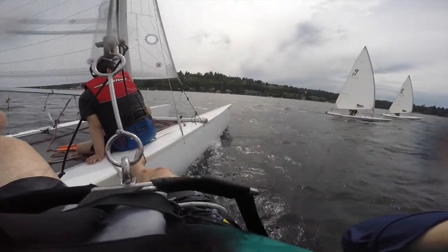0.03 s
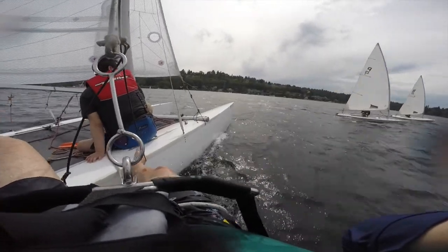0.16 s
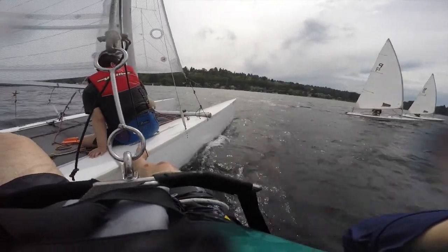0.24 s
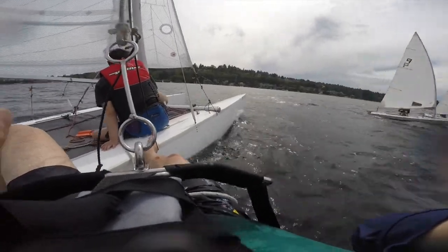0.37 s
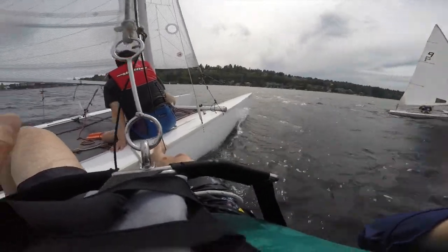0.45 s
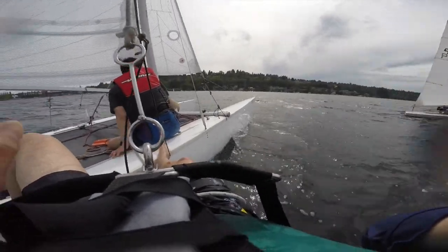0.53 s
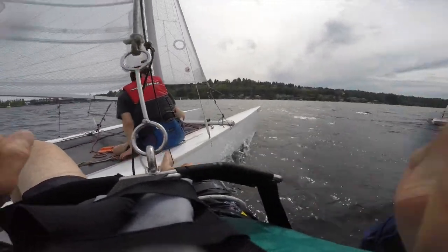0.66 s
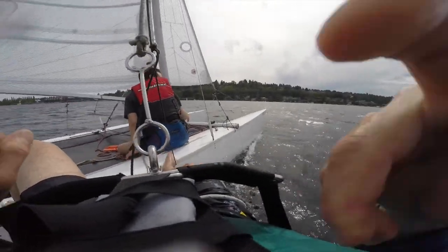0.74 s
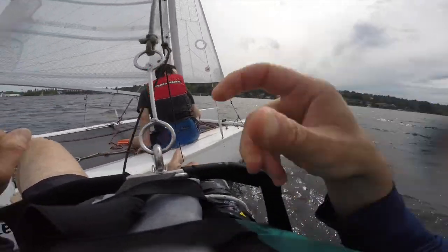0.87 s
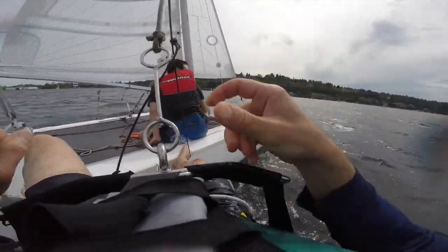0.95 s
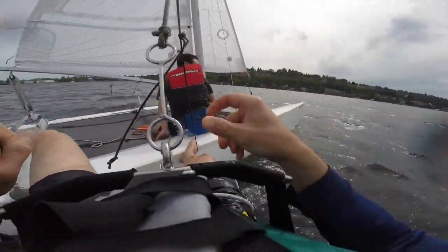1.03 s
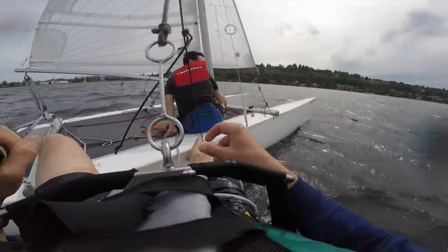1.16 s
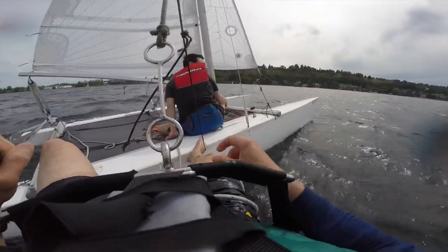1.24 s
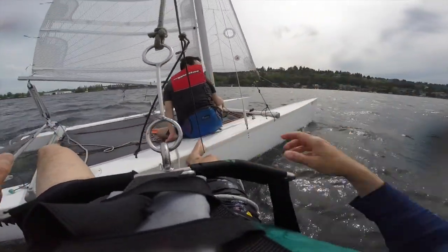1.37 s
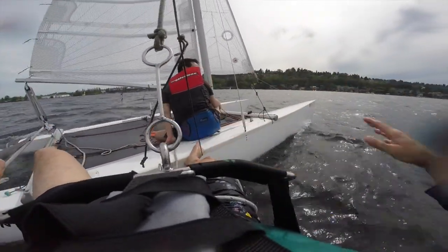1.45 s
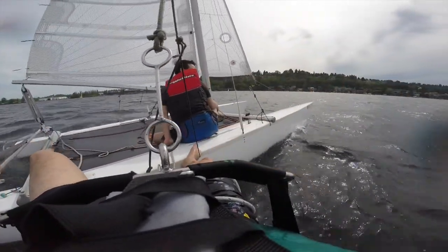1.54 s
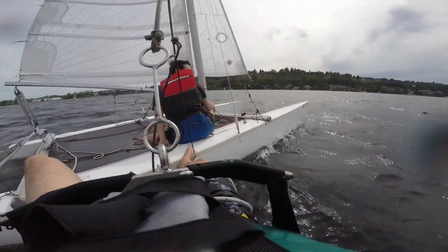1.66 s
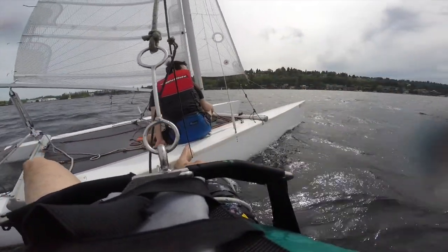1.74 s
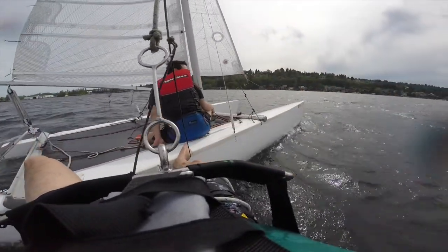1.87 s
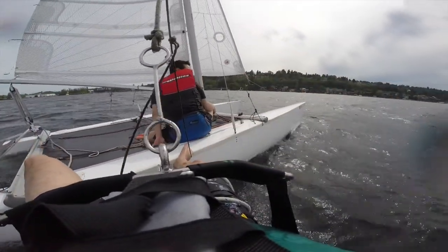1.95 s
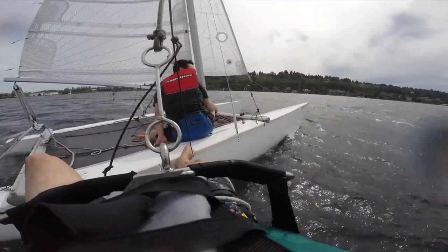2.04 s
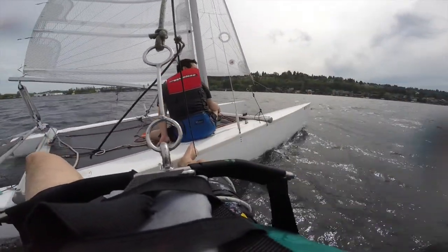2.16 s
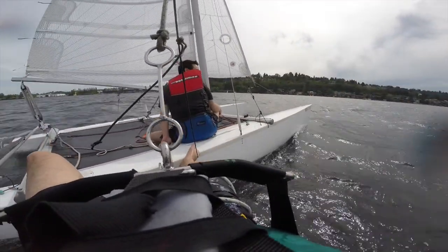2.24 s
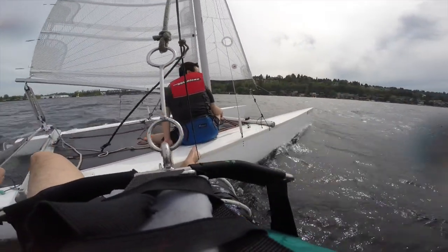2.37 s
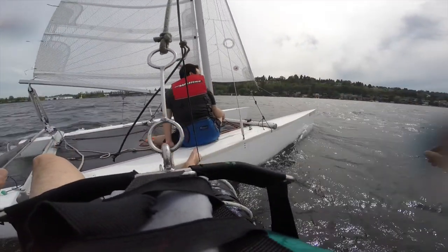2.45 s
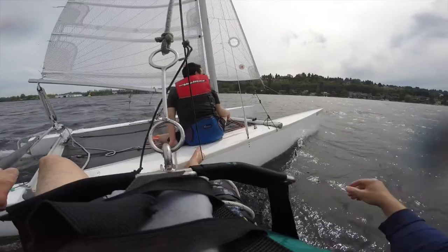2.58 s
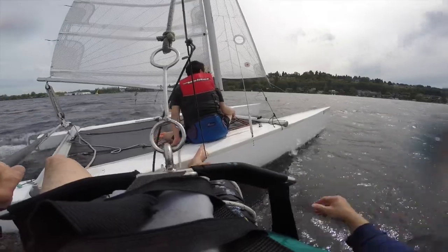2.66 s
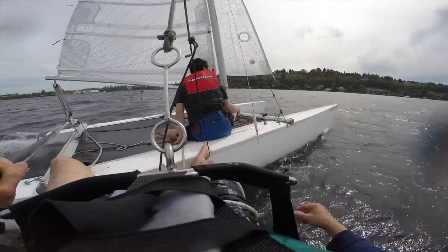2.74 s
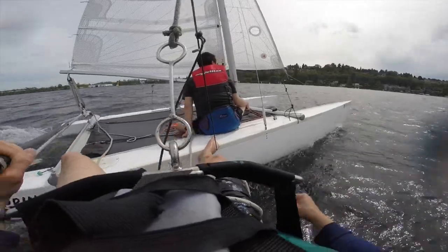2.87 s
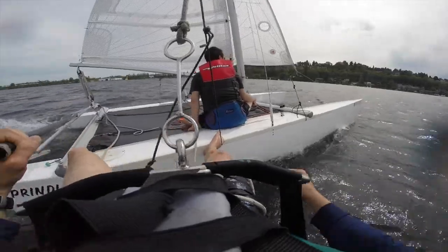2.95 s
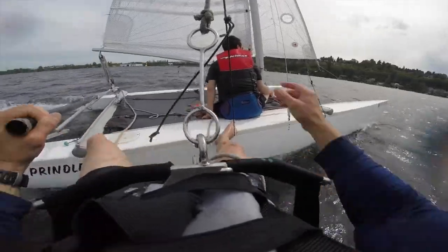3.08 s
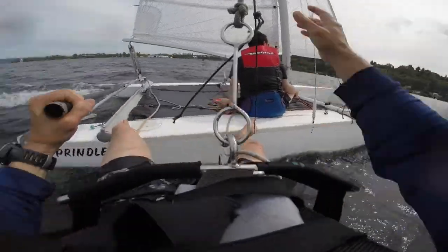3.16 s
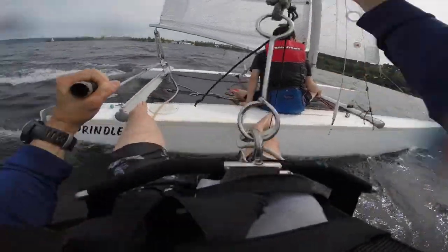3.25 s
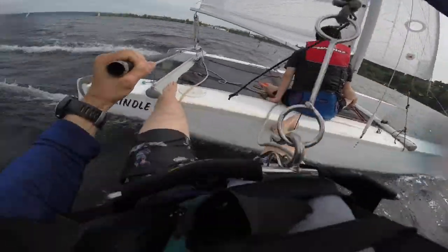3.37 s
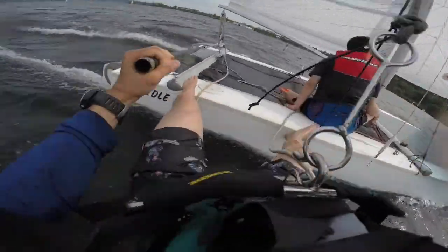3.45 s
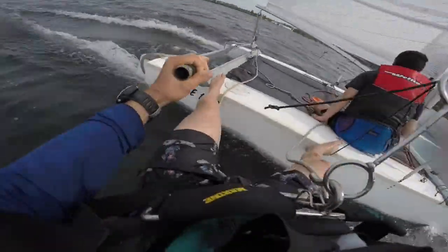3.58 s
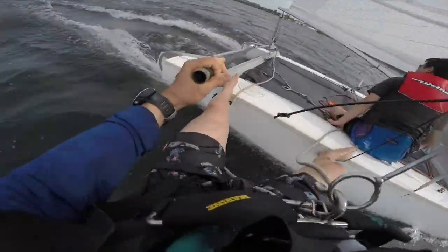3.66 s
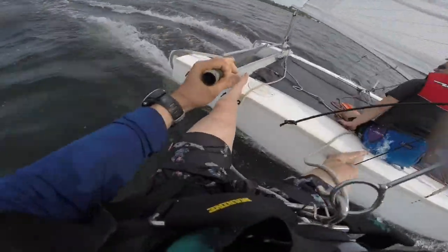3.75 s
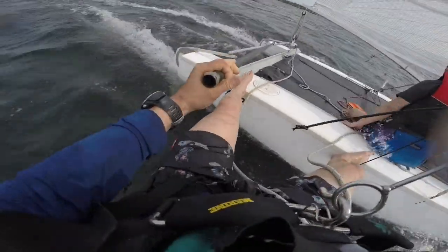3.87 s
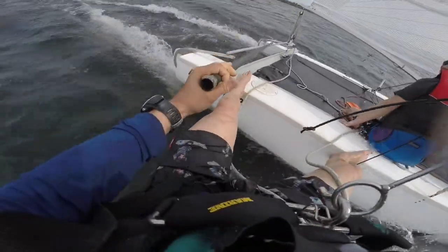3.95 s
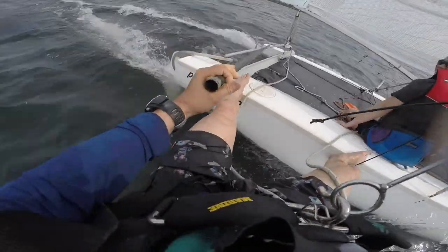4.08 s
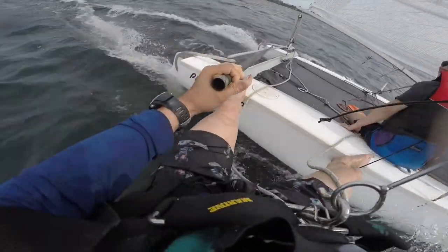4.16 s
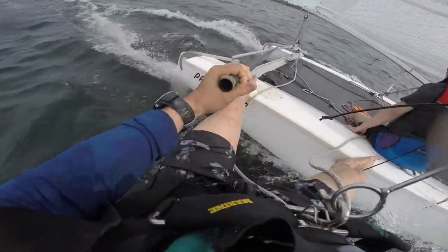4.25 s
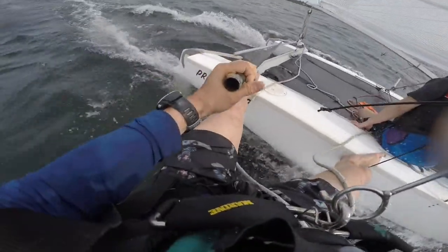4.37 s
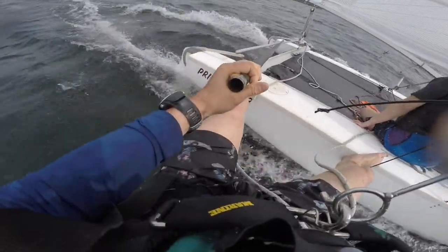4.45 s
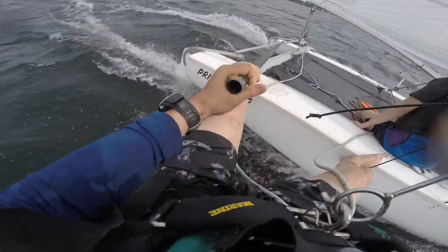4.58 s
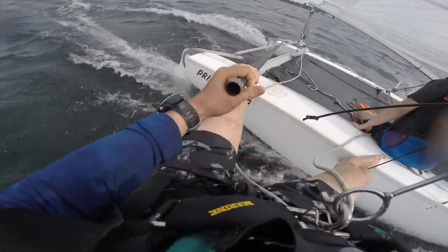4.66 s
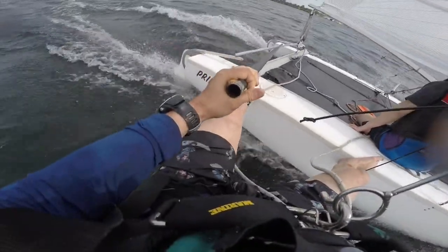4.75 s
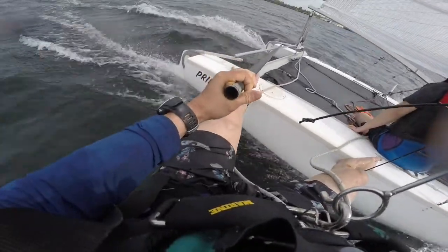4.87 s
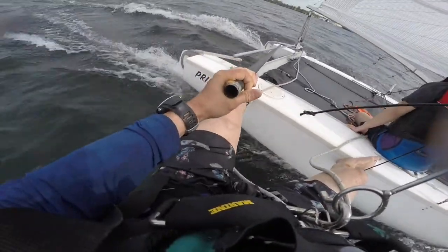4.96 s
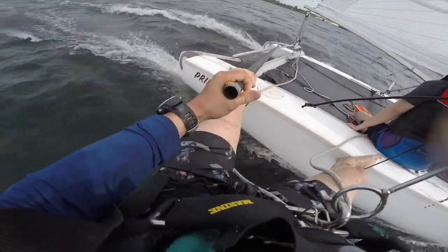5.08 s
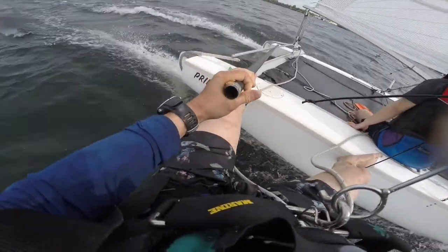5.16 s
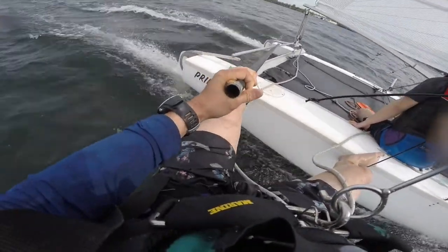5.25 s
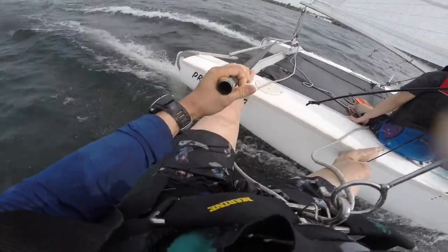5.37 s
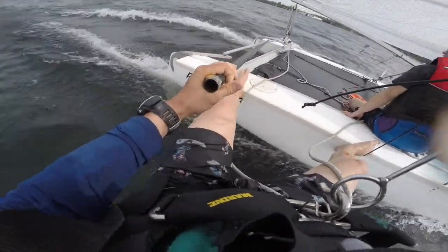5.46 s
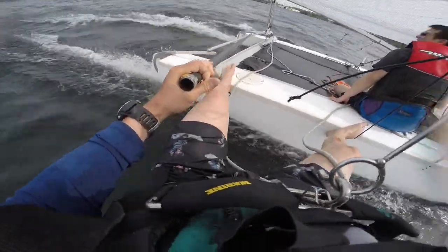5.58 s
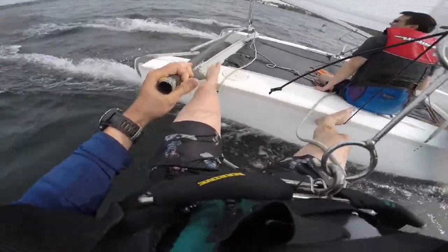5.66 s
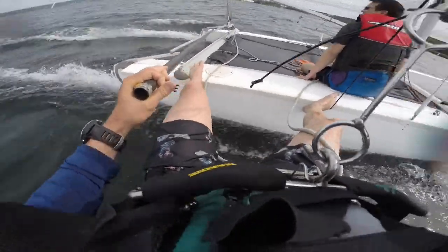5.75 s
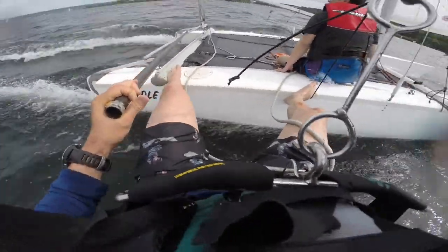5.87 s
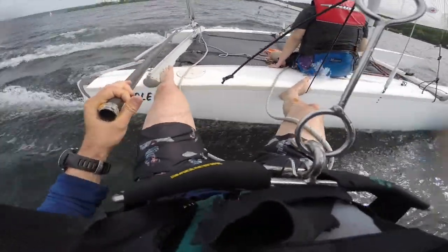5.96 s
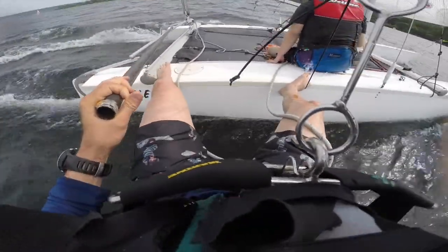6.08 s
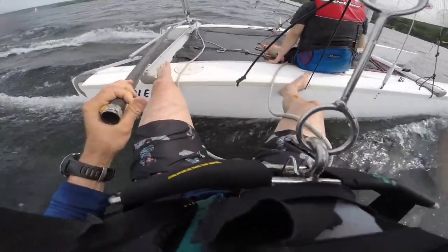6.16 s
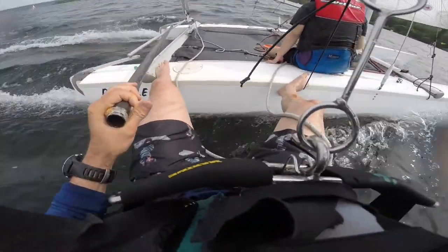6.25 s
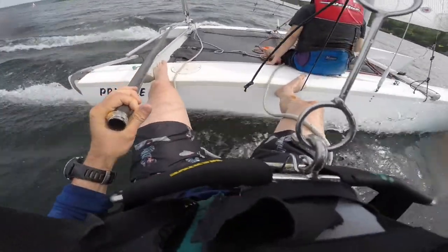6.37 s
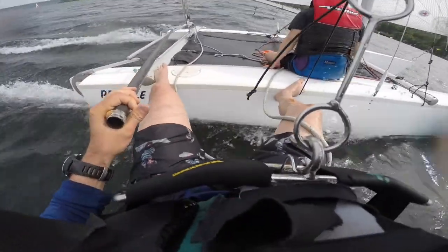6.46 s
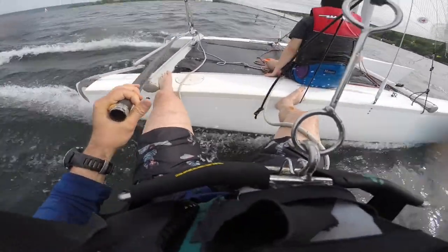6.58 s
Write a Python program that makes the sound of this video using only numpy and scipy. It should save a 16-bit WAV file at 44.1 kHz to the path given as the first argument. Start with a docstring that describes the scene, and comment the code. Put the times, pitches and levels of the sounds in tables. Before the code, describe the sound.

Water rushes and fizzes steadily along a small catamaran's hull, sounding boxy through a body-worn camera's waterproof case. Early on, harness hardware clacks loudly against the case several times. Wind rumbles and puffs, with a faint brief whistle and small wave slaps. Midway, clothing rubs and thuds on the microphone, then the wake turns brighter and hissier. A few lighter knocks follow, and a sharp double clack near the end.

```python
"""On choppy water aboard a small, fast catamaran; the microphone is in a camera in a waterproof case
worn by the helmsman. The wake rushes and fizzes through the resonances of the case, and small waves
slap the hull. Right at the microphone, harness hardware knocks on the case, and clothing rubs and
bumps it as he leans out over the side. Wind buffets the case and briefly whistles."""
import sys
import numpy as np
from scipy import signal
from scipy.fft import rfft, irfft
from scipy.io import wavfile
from scipy.ndimage import uniform_filter1d

SR = 44100
rng = np.random.default_rng(int(sys.argv[2]) if len(sys.argv) > 2 else 0)


def inscribe(sig):
    """Save sig as 16-bit PCM at rate SR to the path in sys.argv[1].

    A 1-D sig is mono; a 2-D sig holds one channel per row.
    Samples are clipped to [-1, 1] before scaling.
    """
    pcm = np.round(np.clip(np.atleast_2d(sig).T, -1, 1) * 32767)
    wavfile.write(sys.argv[1], SR, pcm.astype(np.int16))


N = 291930
T = np.arange(N) / SR
TOP_HZ = 15100  # upper limit of the camera's sound

# flow along the hull: (time [s], level above cruising [dB])
HULL_FLOW = [(0.1, 2.2), (0.55, -0.8), (1.08, 0.8), (1.7, -1.2), (2.05, -0.3), (2.75, -0.5), (3.3, 2.2),
             (4.2, -0.94), (4.6, 2.5), (5.1, 0.2), (5.9, 1), (6.3, 0), (6.62, 1)]
# swing of the microphone from the bow towards the wake: (time [s], share [0-1])
MIC_TURN = [(2.9, 0.15), (3.7, 1), (5.7, 0.98), (6.1, 0.4)]
# rushing water, heard from inside the case: (frequency [Hz], level [dB])
RUSH_SPECTRUM = [(200, -9.5), (450, -6), (750, -13.5), (1050, -7.5), (1350, -0.5), (1750, 2), (2000, -1.5),
                 (2400, -2), (2900, -13), (3300, -8), (3800, -16), (6000, -48)]
# spray, heard from inside the case: (frequency [Hz], level [dB])
SPRAY_SPECTRUM = [(2500, -12), (3600, -6.5), (4150, -1), (4700, -1.5), (4980, -4.5), (5450, 1.5),
                  (6200, -2), (7000, -8), (8100, -16), (10400, -13), (11300, -21), (12300, -19),
                  (14000, -24), (15500, -34)]
# change in the water's colour with the microphone on the wake: (frequency [Hz], gain [dB])
WAKE_TILT = [(400, 1.5), (750, 2), (1050, -2.5), (1350, 0), (2100, -1.5), (2700, -0.5), (3500, -2),
             (4300, 2), (5600, -0.5), (7000, 1.5), (8800, -1.5), (10200, -3), (11400, 2.5), (12500, 3),
             (15000, 0)]
# small waves slapping the hull: (time [s], level [dB], half length [s])
HULL_SLAPS = [(1.048, -50, 0.078), (1.81, -43, 0.0091), (2.144, -51, 0.035), (2.586, -50, 0.018)]
# spray flung from the hull: (time [s], level [dB], half length [s])
SPRAY_BURSTS = [(.15, -62, 0.029), (.27, -63, 0.012), (1.95, -64, 0.07), (2.057, -52, 0.006),
                (2.93, -59, 0.054), (3.9, -63, 0.06), (4.595, -56, 0.0061), (4.65, -58, .05),
                (6.6, -54, 0.028)]

# modes of the case around the microphone: (frequency [Hz], level [dB], t60 [s])
CASE_MODES = [(850, -11, 0.0054), (1300, -1, 0.011), (1722, 6.5, 0.013), (2388, 6, 0.014), (2587, 8, 0.018),
              (3450, 0, 0.0089), (4060, 3, 0.0074), (5400, 5.5, 0.0059), (6370, -2, 0.0051),
              (8200, 3, 0.003), (12400, -23, .003)]
# hardware striking the case: (time [s], level [dB], brightness [Hz], pitch of the spot struck [Hz],
# delay of second contact [s], snap relative to the clack [dB], push on the wall [dB])
HARNESS_KNOCKS = [(0.4801, -5.5, 3180, 2450, 0.00057, -10, -3), (.611, -4, 2900, 2090, 0.0014, -55, -17),
                  (0.6799, -7.5, 5600, 4200, 0.00062, -26, -20.5),
                  (0.708, -3.5, 6160, 2980, 0.001, -28, -20), (0.7464, -20.5, 5000, 1700, 0.0006, -6, -27),
                  (3.3013, -16.5, 1400, 1280, 0.00064, -20, -23),
                  (3.7482, -19, 8560, 3270, 0.00063, -6, -26), (3.806, -25, 6500, 3500, 0.0009, -8, -47),
                  (3.913, -21.5, 3480, 3380, 0.00096, -28, -31),
                  (4.4253, -16, 2700, 2630, 0.0014, -45, -30),
                  (5.7848, -6.5, 3760, 2500, 0.00088, -17, -22),
                  (5.8067, -16.5, 2560, 2460, 0.00096, -50, -16)]
# the body bumping the case: (time [s], level [dB], pitch [Hz], t60 [s])
BODY_BUMPS = [(.712, -17, 88.5, 0.06), (0.747, -31, 640, 0.027), (0.895, -20.5, 62.5, 0.076),
              (3.291, -9.5, 133.5, 0.075), (3.301, -15, 159, 0.021), (3.345, -14.5, 112, 0.045),
              (3.566, -14.5, 86.7, 0.14), (3.583, -12.5, 126.5, 0.12), (4.427, -24, 280, 0.022),
              (4.635, -34.5, 343, 0.013), (5.529, -19.5, 131.7, 0.049), (6.215, -27.5, 279, 0.022)]

# wind on the case, sheltered while he leans out: (time [s], level [dB])
WIND_LEVEL = [(0.0, -36.5), (0.95, -34.5), (1.4, -38.5), (1.8, -36), (3.05, -34.5), (3.45, -27.5),
              (4.15, -42.5), (5.35, -45.5), (5.9, -33), (6.25, -41.5), (6.62, -36.5)]
# rumble of that wind: (frequency [Hz], level [dB])
WIND_SPECTRUM = [(12, -11.5), (30, 2.5), (60, 0.5), (120, 0), (180, -5), (240, -10.5), (300, -7.5),
                 (380, -17), (550, -24), (1000, -28), (3000, -74)]
# puffs across the case: (time [s], level [dB], half length [s])
WIND_PUFFS = [(1.05, -37, 0.077), (1.70, -30.5, 0.052), (1.81, -28, 0.039), (2.41, -29, .028),
              (5.95, -36.5, 0.033)]
# rumble of the puffs: (frequency [Hz], level [dB])
PUFF_SPECTRUM = [(40, -2.5), (110, 5), (190, -1), (260, -14), (320, -12), (450, -23), (1500, -60)]

# clothing sliding over the case: (time [s], level [dB], half length [s])
CLOTH_STROKES = [(3.295, -30, 0.013), (3.275, -39.5, 0.044), (3.46, -35, 0.045), (3.59, -32.5, 0.024),
                 (3.55, -41.5, 0.3)]
# cloth on the case: (frequency [Hz], level [dB])
CLOTH_SPECTRUM = [(50, -8), (130, 14.5), (240, 12.5), (310, 13), (420, 6), (520, -19), (780, -4), (1100, 5),
                  (1700, 0), (2400, 2), (3400, -1.5), (4300, -14.5), (5000, -18.5), (8000, -36),
                  (15000, -57)]
# a fingertip on the case: (frequency [Hz], level [dB])
FINGER_SPECTRUM = [(300, -29), (900, -6), (1700, 4.5), (2200, -6), (2700, 4), (3200, -2.5), (4200, -6.5),
                   (6000, -12.5), (8000, -21.5), (12500, -22), (15500, -25)]


def water(rush_db=-44.5, spray_db=-54.5, wake_spray_db=3, bow_ring_db=-58, wake_ring_db=-46):
    """Churn and bursting foam at the hull grow with the flow; air in the case rings in two bands."""
    flow = undb(curve(HULL_FLOW))
    turn = curve(MIC_TURN)
    churn = flutter(rate_hz=35, depth_db=1.5)
    churn += undb(-11) * bubbles(low_hz=702, high_hz=3400, cycles=15.3, spread_db=2.5, count=7000)
    foam = flutter(rate_hz=44, depth_db=0.5)
    foam += undb(-8.5) * bubbles(low_hz=3050, high_hz=13500, cycles=17, spread_db=3, count=10000)
    slaps = swells(HULL_SLAPS)
    low_ring = resonate(flutter(rate_hz=22, depth_db=2), hz=2349, width_hz=210)
    high_ring = resonate(flutter(rate_hz=27, depth_db=1.5), hz=2670, width_hz=215)
    rush = colour(churn, RUSH_SPECTRUM) + undb(-5.5) * low_ring
    # pointed at the wake, the microphone picks up more ring and more spray
    ring_gain = (1 - turn) * undb(bow_ring_db) + turn * undb(wake_ring_db)
    spray_gain = flow ** 0.8 * undb(spray_db + wake_spray_db * turn) + swells(SPRAY_BURSTS)
    wash = rush * (flow * undb(rush_db) + slaps)
    wash += high_ring * (flow * ring_gain + slaps)
    wash += colour(foam, SPRAY_SPECTRUM) * spray_gain
    return (1 - turn) * wash + turn * equalise(wash, WAKE_TILT)


def harness_knocks(contact_s=0.00032, crack_s=0.004, push_s=0.00053, rebound_s=0.0029):
    """Hardware hits right at the microphone: the case rings and cracks, and its wall is pushed in."""
    out, t = np.zeros(N), T[:SR // 10]
    hz, mode_db, t60 = np.transpose(CASE_MODES)[:, :, None]
    snap = lowpass(signal.unit_impulse(len(t), int(contact_s * SR)), hz=4500, order=1)
    # the pressure rises at once, then leaks away and swings slightly under
    push = t / push_s * np.exp(1 - t / push_s)
    push -= push_s * t / rebound_s ** 2 * np.exp(1 - t / rebound_s)
    for s, db, bright_hz, spot_hz, second_s, snap_db, push_db in HARNESS_KNOCKS:
        # the spot struck drives its own modes hardest; each blow's brightness sets how far up the modes it
        # reaches
        spot_db = 7 * np.exp(-(np.log2(hz / spot_hz) / 0.23) ** 2)
        drive = undb(mode_db + spot_db) / np.hypot(1, (hz / bright_hz) ** 4)
        modes = drive * np.sin(2 * np.pi * hz * t) * decay(t, t60)
        ring = modes[::2].sum(axis=0) - modes[1::2].sum(axis=0)
        ring *= 1 - np.exp(-t / contact_s)
        crack = lowpass(rng.standard_normal(len(t)), bright_hz, order=3) * np.exp(-t / crack_s)
        touch = unit_peak(ring) + undb(-19) * crack
        # a second contact follows so closely that it only hollows the colour
        clack = touch + undb(-2) * np.interp(t - second_s, t, touch, left=0)
        blow = unit_peak(clack) + undb(snap_db) * unit_peak(snap)
        add(out, s, undb(db) * blow + undb(push_db) * push)
    return out


def body_bumps(rise_s=0.0034, overtone_db=-7, padding_hz=450):
    """Padded blows rock the case on its mount in dull thuds; the padding swallows high overtones."""
    out, t = np.zeros(N), T[:SR // 4]
    for s, db, hz, t60 in BODY_BUMPS:
        overtone_hz = 2.3 * hz
        overtone_gain = undb(overtone_db) / np.hypot(1, (overtone_hz / padding_hz) ** 4)
        swing = np.sin(2 * np.pi * hz * t) + overtone_gain * np.sin(2 * np.pi * overtone_hz * t)
        thud = swing * (1 - np.exp(-t / rise_s)) * decay(t, t60)
        add(out, s, undb(db) * unit_peak(thud))
    return out


def wind_buffet():
    """Eddies beat directly on the case: a low rumble with brief puffs."""
    rumble = colour(flutter(rate_hz=70, depth_db=0.84), WIND_SPECTRUM)
    puffs = colour(flutter(rate_hz=60, depth_db=2.5), PUFF_SPECTRUM)
    return rumble * undb(curve(WIND_LEVEL)) + puffs * swells(WIND_PUFFS)


def cloth_rub():
    """Clothing drags over the case in uneven strokes as he leans out."""
    return colour(flutter(rate_hz=130, depth_db=2), CLOTH_SPECTRUM) * swells(CLOTH_STROKES)


def finger_graze(start_s=0.895, level_db=-26, hold_s=0.0145, edge_s=0.0025):
    """A fingertip catches the case, slides and lets go."""
    since = T - start_s
    contact = np.clip(1 + np.minimum(since, hold_s - since) / edge_s, 0, 1)
    return colour(flutter(rate_hz=900, depth_db=1.3), FINGER_SPECTRUM) * undb(level_db) * contact


def wind_whistle(middle_s=1.51, level_db=-49.5, half_s=0.24, middle_hz=1173, rest_hz=1016, sag_s=0.27):
    """Air sings faintly on an edge for a moment, its pitch sinking ever more slowly."""
    hz = rest_hz + (middle_hz - rest_hz) * np.exp(np.minimum((middle_s - T) / sag_s, 2))
    phase = 2 * np.pi * np.cumsum(hz) / SR
    breathy_tone = unit_rms(wander(rate_hz=100) * np.sin(phase) + wander(rate_hz=100) * np.cos(phase))
    return breathy_tone * swells([(middle_s, level_db, half_s)])


def bubbles(low_hz, high_hz, cycles, spread_db, count):
    """Bubbles ring as short rising pings, a few much louder than the rest; rms 1."""
    when, pitch, rank = rng.random((count, 3)).T[:, :, None]
    hz = low_hz * (high_hz / low_hz) ** pitch
    samples = np.arange(400)
    turns = hz * samples / SR
    age = np.minimum(turns / cycles, 2)
    gain = undb(-spread_db * np.log(np.maximum(rank, 0.004)))
    pings = gain * np.sin(2 * np.pi * turns * (1 + 0.11 * age)) * decay(age, 1)
    positions = (when * N).astype(int) + samples
    return unit_rms(np.bincount(positions.ravel(), pings.ravel())[:N])


def gain_control(x, threshold_db=-9, slope=0.34, release_db_per_s=28, attack_hz=18):
    """Loud peaks quickly pull the camera's gain down; it then creeps back."""
    fall = release_db_per_s * T
    level_db = 20 * np.log10(np.abs(x) + 1e-9)
    held_db = np.maximum.accumulate(level_db + fall, axis=-1) - fall
    excess_db = lowpass(np.maximum(held_db - threshold_db, 0), attack_hz, order=1)
    return x * undb(-slope * excess_db)


def undb(db):
    """Decibels to gain."""
    return 10 ** (np.asarray(db) / 20)


def unit_rms(x):
    """Scale to rms 1."""
    return x / np.sqrt(np.mean(x ** 2))


def unit_peak(x):
    """Scale to peak 1."""
    return x / np.abs(x).max()


def decay(t, t60):
    """A fade of 60 dB every t60."""
    return np.exp(-np.log(1000) * t / t60)


def curve(table):
    """Timed points joined by straight lines."""
    return np.interp(T, *np.transpose(table))


def swells(table):
    """A sum of bell-shaped swells."""
    return sum(undb(db) * np.exp(-((T - s) / half) ** 2) for s, db, half in table)


def wander(rate_hz):
    """Random steps, smoothed twice; rms 1."""
    hold = max(int(SR / rate_hz), 1)
    steps = np.repeat(rng.standard_normal(N // hold + 1), hold)
    return unit_rms(uniform_filter1d(uniform_filter1d(steps, hold), hold)[:N])


def flutter(rate_hz, depth_db):
    """Noise whose level flickers; rms 1."""
    return unit_rms(rng.standard_normal(N) * undb(depth_db * wander(rate_hz)))


def equalise(x, spectrum):
    """Filter by a curve of gain over log frequency."""
    hz, db = np.transpose(spectrum)
    bins_hz = np.maximum(np.arange(N // 2 + 1) * SR / N, 1)
    return irfft(rfft(x) * undb(np.interp(np.log(bins_hz), np.log(hz), db)), N)


def colour(x, spectrum):
    """Give a noise its spectrum; rms 1."""
    return unit_rms(equalise(x, spectrum))


def resonate(x, hz, width_hz):
    """A steep resonance: the same band-pass twice; rms 1."""
    b, a = signal.iirpeak(hz, hz / width_hz, fs=SR)
    return unit_rms(signal.lfilter(b, a, signal.lfilter(b, a, x)))


def lowpass(x, hz, order):
    """Butterworth low-pass."""
    return signal.sosfilt(signal.butter(order, min(hz, TOP_HZ), fs=SR, output="sos"), x)


def add(out, s, sound):
    """Mix a short sound in at s seconds."""
    start = int(s * SR)
    out[start:start + len(sound)] += sound[:N - start]


def scene():
    """Everything reaches one microphone inside the case."""
    outdoors = water() + wind_buffet() + wind_whistle()
    handling = cloth_rub() + finger_graze() + harness_knocks() + body_bumps()
    return (outdoors + handling)[None]


def record(dry):
    """The camera ducks after knocks, clips at full scale and cuts the top."""
    clipped = np.clip(gain_control(dry), -1, 1)
    return signal.sosfilt(signal.ellip(8, 0.2, 70, TOP_HZ, fs=SR, output="sos"), clipped)


dry = scene()
out = record(dry)
inscribe(out)
```